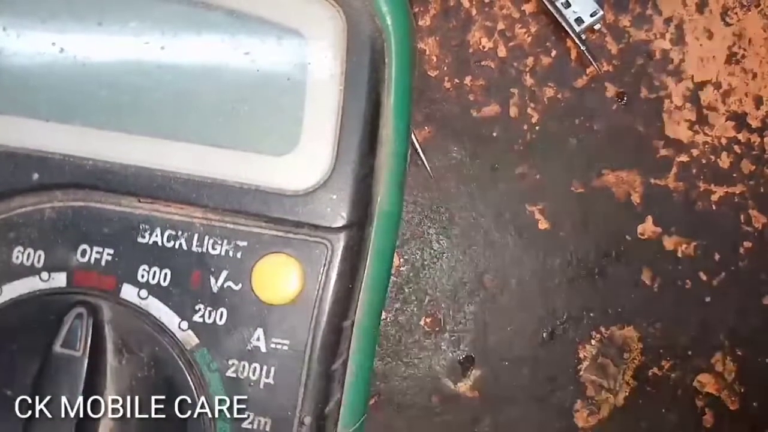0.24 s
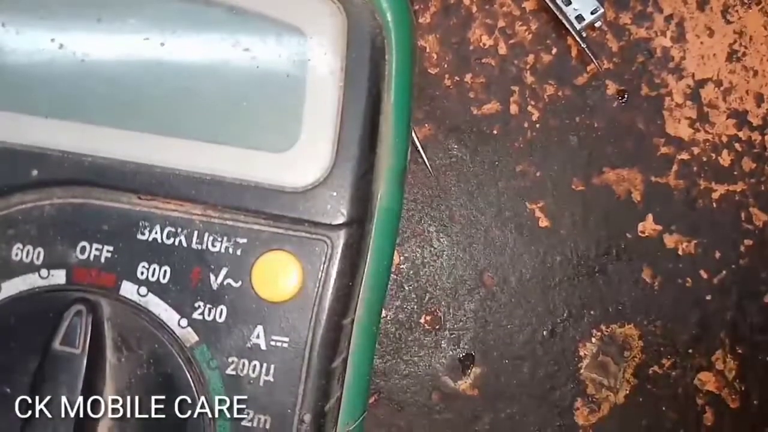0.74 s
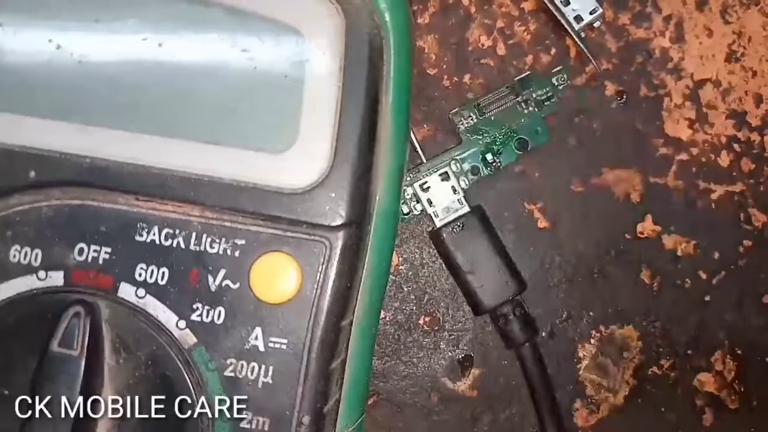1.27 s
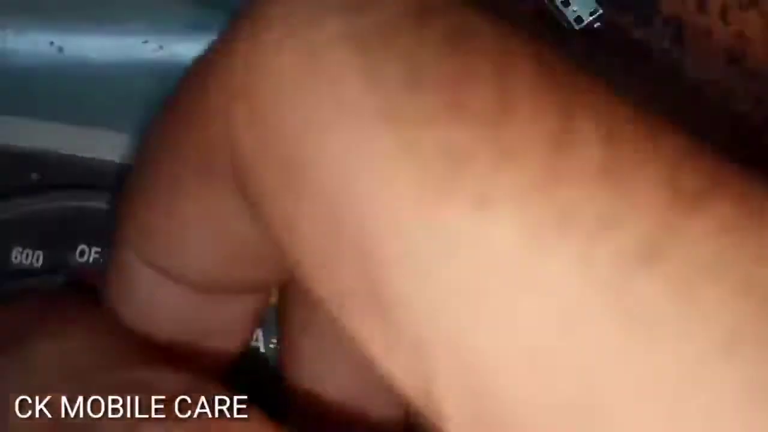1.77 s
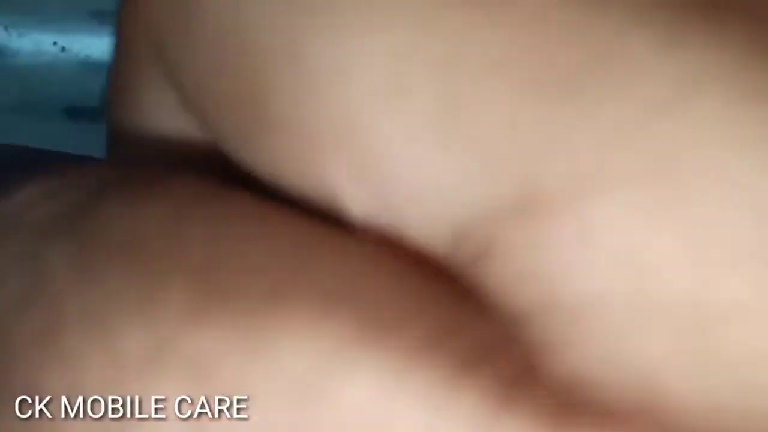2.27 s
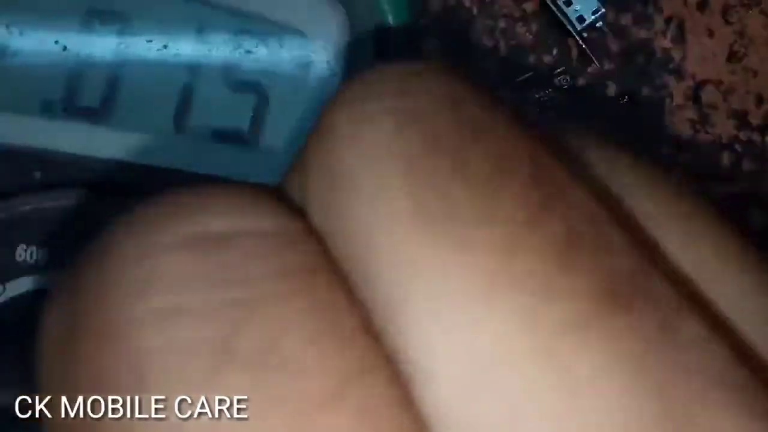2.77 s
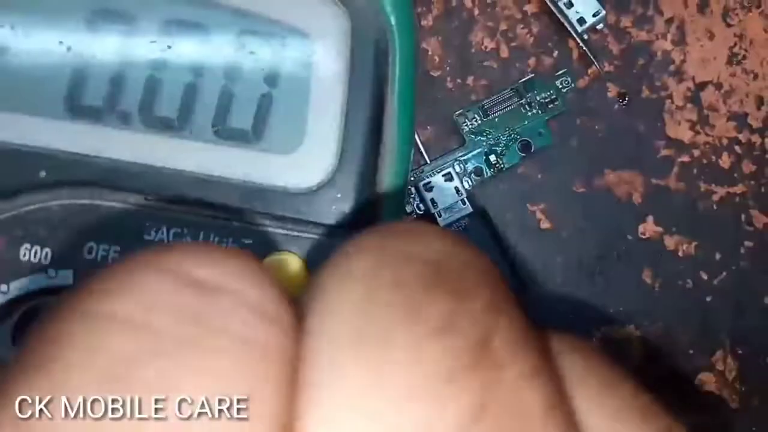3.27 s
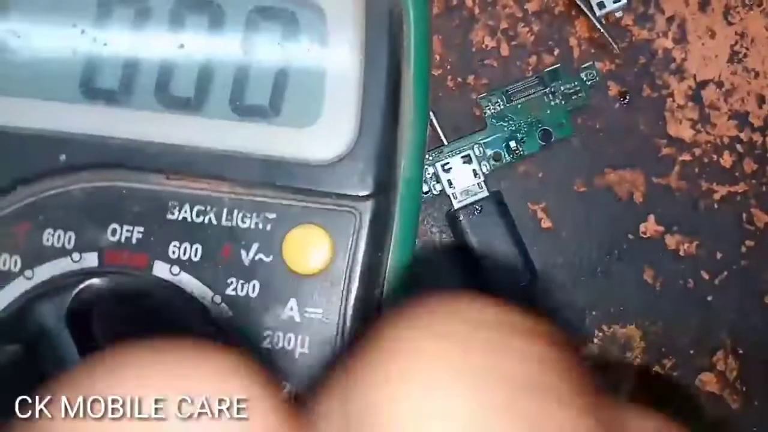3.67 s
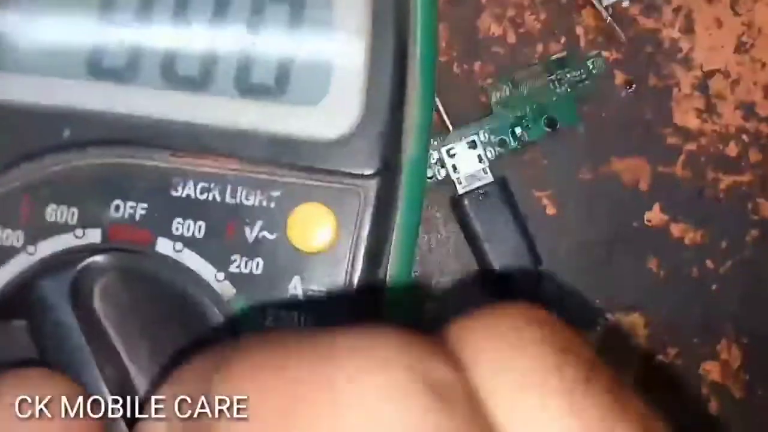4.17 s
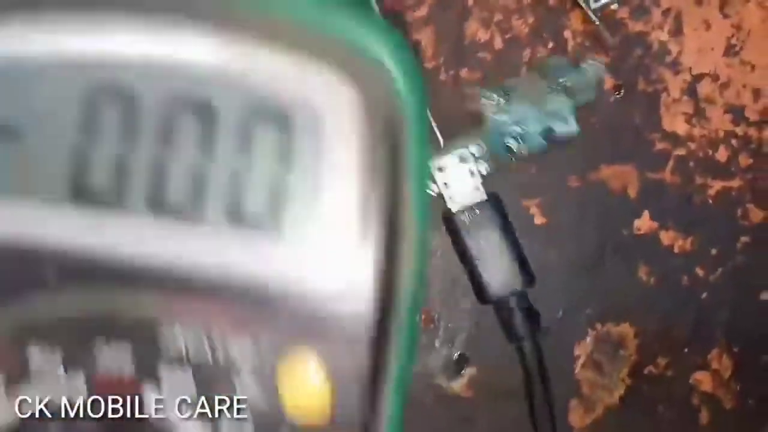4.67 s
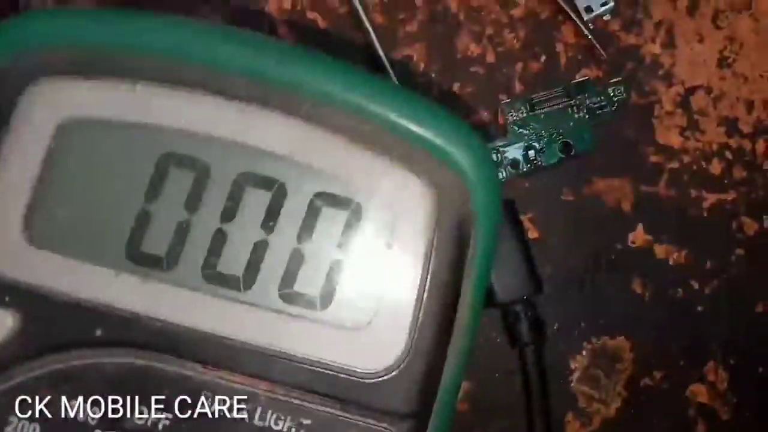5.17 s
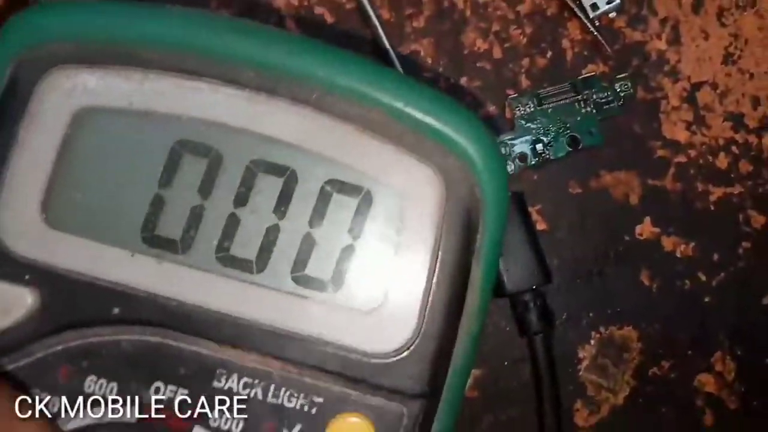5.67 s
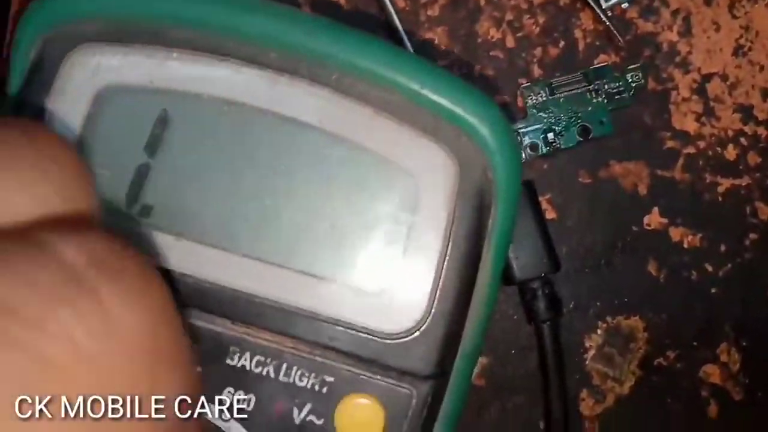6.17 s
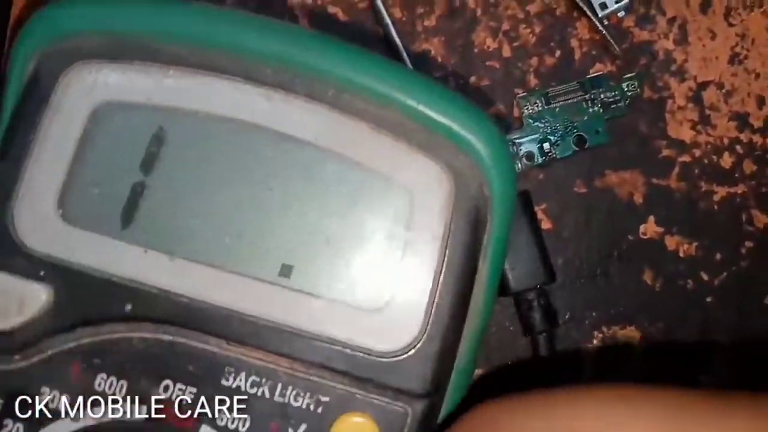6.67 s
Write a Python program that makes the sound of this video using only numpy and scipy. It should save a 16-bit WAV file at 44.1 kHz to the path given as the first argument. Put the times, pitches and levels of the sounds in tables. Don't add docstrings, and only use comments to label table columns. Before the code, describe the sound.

A close phone-microphone perspective in a small workshop, with a quiet, dull rumble from outside throughout. From about 0.2 to 0.5 s a small board and cable land on a steel bench in light bouncing knocks, with a dry rubbing slide; another knock comes at 0.7 s and fainter ones near 0.95 s. After a brief lull, a plastic rotary dial starts turning at 1.6 s: a softer first click, then loud, short, hard snaps in an uneven quick run until 2.7 s, each ringing the hollow case very briefly. One click at 3.8 s is followed by faint fingertip taps and skin rubs until about 4.4 s, one tap at 4.2 s clearer. Five evenly paced clicks run from 5.0 to 5.7 s, then three more at 6.35, 6.6 and 6.7 s. The room answers only faintly, leaving the low rumble.

```python
import sys
import numpy as np
from scipy import signal
from scipy.fft import rfft, irfft, next_fast_len
from scipy.io import wavfile
from scipy.ndimage import uniform_filter1d

SR = 44100
rng = np.random.default_rng(int(sys.argv[2]) if len(sys.argv) > 2 else 0)


def to_linear_factor(level_db):
    exponent = np.asarray(level_db, float) / 20
    return 10 ** exponent


def inscribe(sig):
    pcm = np.round(np.clip(np.atleast_2d(sig).T, -1, 1) * 32767)
    wavfile.write(sys.argv[1], SR, pcm.astype(np.int16))


N = 305375

# start_s, snap_peak_db, weight_db, softness_db,
# crispness_db (of the tick)
DETENTS = [(1.5942, -21, 10.5, 6, 4), (1.7471, -10.5, -1, 5, 6), (1.8454, -5, 2.5, -1.5, 4),
           (1.9508, -11, 3.5, 5.5, 0), (2.0773, -33.5, -14.5, 19, -12.5), (2.0992, -4, -3.5, -3, -4.5),
           (2.3052, -2, 4, -3.5, -0.5), (2.51, -1, -1, -6.5, -1), (2.633, -5.5, -4, -1, 3),
           (2.6991, -15, 0.5, 3.5, -39.5), (3.7672, -9, -1, 6, -3.5), (4.9761, -6.5, -3, -4.5, 3),
           (5.1337, -12, -2.5, 1, 6), (5.2929, -9, 0, 0, 5), (5.5043, -4, 0, -4.5, -3),
           (5.7041, -5, 0, -2.5, -2.5), (6.353, -10, 6.5, 8, 7.5), (6.5738, -1.5, -5, -10.5, -8),
           (6.7093, -4.5, -2.5, -3, 0.8)]
# start_s, click_peak_db, weight_db, softness_db
TOUCHES = [(2.7279, -39, 12.5, 9), (3.0794, -57, 25, 12.5), (3.7094, -59.5, 9, 15.5),
           (3.7974, -39.5, 27, -9), (3.8477, -38, 2, -9), (3.907, -57, 35, 8), (3.9678, -49, -10, 12.5),
           (4.0026, -47, -16, 10.5), (4.0394, -57, 11, 22), (4.0856, -43, 0, 16), (4.1434, -43.5, 5, 13.5),
           (4.1587, -44.5, 18.5, 7), (4.1859, -25, -6, 7.5), (4.3324, -53, -10, -6),
           (4.3824, -57.5, 8, 0.5), (4.594, -50, -3, 11.5), (5.2313, -50.5, 11, 14.5),
           (5.8138, -36.5, 2.5, 1), (5.875, -48, -8, 15), (6.5306, -40.5, 16, 12)]
# pitch_hz, level_db, t60_s (time to fall by 60 dB)
CASE_MODES = [(129.8, -10.5, 0.08), (196.9, 0, 0.032), (347, 2, 0.021), (475.3, 2.5, 0.021),
              (606, 1, 0.024), (695, -2, 0.015), (1260, -7, 0.018), (1415, -8, 0.044), (1616, 0, 0.013),
              (1915, -2.5, 0.03), (2114, 1, 0.045), (2220, 2.5, 0.011), (2548, -4, 0.025),
              (2722, -2.5, 0.036), (3100, 0, .015), (3459, 6, 0.0058), (3875, 0.5, 0.011),
              (4370, 0.5, 0.0034), (4940, -6, 0.0053), (4830, -11.5, 0.018), (5200, -10, 0.0041),
              (6100, -7, 0.0071), (7170, -5.5, 0.0031), (8430, -14, 0.014), (8130, -3.5, 0.0031),
              (8860, -3.5, 0.0043), (10600, -13.5, 0.0017), (11600, -12.5, .002), (14300, -4, 0.0011),
              (14200, -18.5, .003)]
PLASTIC_CYCLES = 34


def rms_one(x):
    return x / np.sqrt(np.mean(x ** 2) + 1e-20)


def at_hz(points, hz):
    points_hz, points_value = np.array(points).T
    return np.interp(np.log(hz), np.log(points_hz), points_value)


def coloured(x, spectrum):
    size = next_fast_len(len(x))
    hz = np.arange(size // 2 + 1) * SR / size + 1
    return irfft(rfft(x, size) * to_linear_factor(at_hz(spectrum, hz)), size)[:len(x)]


def band_pass(x, order, edges_hz):
    return signal.sosfilt(signal.butter(order, edges_hz, "band", fs=SR, output="sos"), x)


def drift(rate):
    knots = rng.standard_normal(400)
    return np.interp(np.arange(N) / SR * rate, np.arange(400), knots)


def ring(push, hz, t60):
    r = to_linear_factor(-60 / (t60 * SR))
    w = 2 * np.pi * hz / SR
    return signal.lfilter([0, np.sin(w)], [1, -2 * r * np.cos(w), r * r], push)


def answered(events, answer):
    events, answer = np.array(events), np.array(answer)
    levels_db = answer[:, 0] + events[:, 2:] @ answer[:, 1:].T
    return np.hstack([events[:, :2], levels_db])


def blows(events, modes, most_cycles, rise_s, rattle_s, chatter_s, chatter_db, slide_db, push_s, shake_db):
    part_edges_hz = [65, 300, 1200, 2600, 4800, 17000]
    events = np.array(events)
    count, size = len(events), SR // 2
    lead, span = 1024, 4096
    t = (np.arange(span) - lead) / SR
    after = np.maximum(t, 0)
    dying = np.exp(-after / rattle_s) + to_linear_factor(chatter_db) * np.exp(-after / chatter_s)
    shape = (1 - np.exp(-after / rise_s)) * dying
    slide = (t < 0) * to_linear_factor(slide_db) * np.exp(np.minimum(t, 0) / 0.0045)

    draws = rng.random((count, 2, span))
    happens, strike = draws[:, 0] < 0.3, draws[:, 1] - 0.5
    rattle = rfft(happens * strike * shape)
    rattle = irfft(rattle / np.sqrt(uniform_filter1d(np.abs(rattle) ** 2, size=21)), span)
    rattle = rattle / np.abs(rattle).max(axis=1, keepdims=True)
    contacts = np.full((count, size), 1e-18)
    contacts[:, :span] = rattle * (t >= 0) + uniform_filter1d(strike, size=5) * slide
    push = np.full((count, size), 1e-18)
    push[:, :span] = -np.sin(np.pi * np.clip(t / push_s, 0, 1)) ** 2
    push += to_linear_factor(shake_db) * contacts

    strength_db = rng.normal(0, 2, (count, 32))
    parts = np.zeros((5, count, size))
    for k, (hz, level_db, t60) in enumerate(modes):
        part = np.searchsorted(part_edges_hz, hz) - 1
        rung = ring(contacts if part else push, hz, min(t60, most_cycles / hz))
        sign = (-1) ** k if part else 1
        parts[part] += sign * to_linear_factor(level_db + strength_db[:, k:k + 1]) * rung
    for k, edges_hz in enumerate(zip(part_edges_hz, part_edges_hz[1:])):
        parts[k] = band_pass(parts[k], 1, edges_hz)

    against_click_db = np.insert(events[:, 2:], 3, 0, axis=1).T
    peaks = to_linear_factor(events[:, 1] + against_click_db)[:, :, None]
    sounds = (parts * peaks / np.abs(parts).max(axis=2, keepdims=True)).sum(axis=0)
    out = np.zeros(N + size)
    for start_s, sound in zip(events[:, 0], sounds):
        first = round(start_s * SR) - lead
        out[first:first + size] += sound
    return out[:N]


def rumble():
    # pitch_hz, level_db (per Hz)
    rumble_colour = [(20, -35), (50, -18.5), (125, 1), (165, -6), (250, -15.5), (310, -11), (410, -15.5),
                     (590, -8.5), (720, -16), (1150, -23.5), (1550, -21), (3400, -30.5), (4100, -39.5),
                     (5000, -55), (8000, -100)]
    rest = rms_one(coloured(rng.standard_normal(N), rumble_colour))
    out = 0
    for hz in (260, 1000, 3300):
        low = signal.sosfiltfilt(signal.butter(2, hz, fs=SR, output="sos"), rest)
        out = out + low * to_linear_factor(1.1 * drift(5))
        rest = rest - low
    return to_linear_factor(-45.5) * (out + rest * to_linear_factor(1.8 * drift(4)))


def rubbing():
    # start_s, length_s, level_db, dull_share_db
    rub_strokes = [(0.178, 0.05, -31.5, -3.5), (0.318, 0.49, -28, -3.5), (0.585, 0.21, -46, -2),
                   (0.75, 0.135, -45, 6.5), (0.855, 0.29, -45, -6), (2.698, 0.1, -41.5, -1),
                   (3.76, 0.19, -51, 5), (3.926, 0.18, -37.5, -1.5), (4.103, 0.16, -53, 5),
                   (4.55, 0.27, -58, 9)]
    # pitch_hz, level_db (per Hz)
    rub_colour = [(100, 12), (300, -7), (900, -37), (2200, -2.5), (4200, -16), (5500, -30.5), (8500, -32),
                  (12000, -67)]
    ease_s, fade_db_per_s = 0.043, 78
    t = np.arange(N) / SR
    unevenness_db = 3.5 * np.minimum(rng.exponential(1, N), 5) + 2.5 * drift(55)
    slips = rng.standard_normal(N) * to_linear_factor(unevenness_db)
    bright = rms_one(coloured(slips, rub_colour))
    dull = rms_one(band_pass(slips, 2, [150, 1000]))
    out = np.zeros(N)
    for start_s, length_s, level_db, dull_db in rub_strokes:
        ease = np.clip(np.minimum(t - start_s, start_s + length_s - t) / ease_s, 0, 1)
        fading_db = level_db - fade_db_per_s * np.maximum(t - start_s, 0)
        out += ease * to_linear_factor(fading_db) * (bright + to_linear_factor(dull_db) * dull)
    return out


def bench_knocks():
    # start_s, click_peak_db, weight_db, softness_db
    knocks = [(0.195, -19.5, 13, 8.5), (0.2697, -36.5, 17.5, 2.5), (0.2952, -34, 22.5, -5),
              (0.3387, -37, -7, -15), (0.3711, -37, 22.5, -7), (0.397, -18.5, 10, 12.5),
              (0.4363, -41.5, 11.5, 26.5), (0.4643, -43.5, 19.5, 16), (0.4754, -38, -6, 13.5),
              (0.4889, -35, 2, -12), (0.5063, -36, -1, 8.5), (0.6609, -43.5, 8.5, 9),
              (0.717, -16.5, 14.5, 3.5), (0.931, -31, 6.5, -2), (0.9582, -44, 17, 13)]
    # pitch_hz, level_db, t60_s
    bench_modes = [(90, -45, .12), (137.8, -3, 0.37), (183, 2.5, 0.054), (214, 2.5, 0.12),
                   (269, -1.5, 0.12), (319.6, -5.5, 0.046), (460, -6, 0.055), (536.4, -5.5, 0.065),
                   (572, -2, 0.043), (780, -0.5, 0.019), (885, -5.5, 0.034), (966, -6, 0.01),
                   (1245, -1.5, 0.01), (1300, -3.5, 0.011), (1535, 11, 0.0074), (2130, 3, 0.014),
                   (2400, 4, 0.006), (2990, -4, 0.0036), (3360, -13, 0.019), (3450, -4, 0.0041),
                   (3920, -30, 0.015), (5070, -11, .005), (6300, 8, 0.0029), (7300, -16, .005),
                   (8000, 13, 0.0024), (9300, -16, .004), (11100, -9, .002), (14200, -21, 0.0024)]
    # level_db (against the click), share_of_weight, share_of_softness
    bench_answer = [
        (2, 0.9, -0.15),
        (-1, 0.85, 0.41),
        (1, -0.069, 0.93),
        (-18, -0.75, -0.24),
    ]
    steel_cycles = 75
    bench = blows(answered(knocks, bench_answer), bench_modes, steel_cycles, rise_s=0.00079, rattle_s=0.0046,
                  chatter_s=0.013, chatter_db=-4, slide_db=-30, push_s=0.0006, shake_db=0.5)
    return signal.sosfilt(signal.butter(3, 80, "high", fs=SR, output="sos"), bench)


def dial_clicks():
    # level_db (against the click), share_of_weight, share_of_softness, share_of_crispness
    dial_answer = [
        (-11.5, 1, 0.12, -0.15),
        (-6.5, -0.83, 0.93, 0.26),
        (-2.5, -0.16, 0.71, -0.033),
        (-14, 0, 0.016, 0.95),
    ]
    return blows(answered(DETENTS, dial_answer), CASE_MODES, PLASTIC_CYCLES, rise_s=0.00073, rattle_s=0.00059,
                 chatter_s=0.0062, chatter_db=-18.5, slide_db=-25.0, push_s=0.0012, shake_db=1)


def back_cover():
    # pitch_hz, level_db, t60_s
    cover_modes = [(899, 4.5, 0.031), (1027, 3.5, 0.031), (1170, 0, 0.0066)]
    lag_s, cover_db, soft_share = 0.0012, -15.5, 1.31
    taps = np.full(N, 1e-18)
    for start_s, snap_db, _, soft_db, *_ in DETENTS + TOUCHES:
        taps[round((start_s + lag_s) * SR)] = to_linear_factor(snap_db + cover_db + soft_share * soft_db)
    taps = np.convolve(taps, np.hanning(30) / 14.5)[:N]
    out = np.zeros(N)
    for k, (hz, level_db, t60) in enumerate(cover_modes):
        out += (-1) ** k * to_linear_factor(level_db) * ring(taps, hz, t60)
    return out


def finger_touches():
    # level_db (against the click), share_of_weight, share_of_softness
    finger_answer = [
        (-1.5, 1, 0.067),
        (-3, 0.63, 0.17),
        (-2, -0.25, 1),
        (-26, 0.17, 0.22),
    ]
    return blows(answered(TOUCHES, finger_answer), CASE_MODES, PLASTIC_CYCLES, rise_s=0.00014, rattle_s=0.00089,
                 chatter_s=0.01, chatter_db=-12, slide_db=-52, push_s=0.0028, shake_db=0.0)


def room(x):
    # pitch_hz, level_db
    room_colour = [(100, 2), (500, 2.5), (1200, -4), (2500, -5.5), (3500, -9), (4700, -4.5), (5700, -8),
                   (8500, -10), (11000, -2.5), (15000, -8)]
    # pitch_hz, t60_s
    room_t60 = [(100, 0.46), (600, 0.37), (3000, 0.53), (8000, 0.42), (11000, 0.23), (15000, 0.15)]
    t = np.arange(SR // 2) / SR
    tail = 0
    edges_hz = 70 * 2 ** np.arange(0, 8.1, 0.5)
    for low, high in zip(edges_hz, edges_hz[1:]):
        hz = np.sqrt(low * high)
        echoes = band_pass(rng.standard_normal(len(t)), 2, [low, high])
        tail = tail + echoes * to_linear_factor(at_hz(room_colour, hz) - 60 * t / at_hz(room_t60, hz))
    tail = tail * np.clip(t / 0.0028, 0, 1)
    return signal.fftconvolve(x, tail / np.sqrt(np.sum(tail ** 2)))[:N]


def scene():
    near = rubbing() + bench_knocks() + dial_clicks() + back_cover() + finger_touches()
    return (near + to_linear_factor(-20.5) * room(near) + rumble())[None]


def band_limit(x):
    return signal.sosfilt(signal.butter(12, 16620, fs=SR, output="sos"), x)


def record(dry):
    heard = signal.sosfilt(signal.butter(2, 45, "high", fs=SR, output="sos"), dry)
    heard = 1.3 * np.tanh(heard / 1.3)
    heard = heard + to_linear_factor(-87) * rng.standard_normal(dry.shape)
    heard = signal.sosfilt(signal.cheby1(8, 1, 15750, "low", fs=SR, output="sos"), heard)
    return band_limit(heard)


dry = scene()
out = record(dry)
inscribe(out)
```